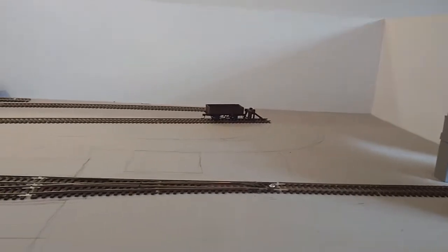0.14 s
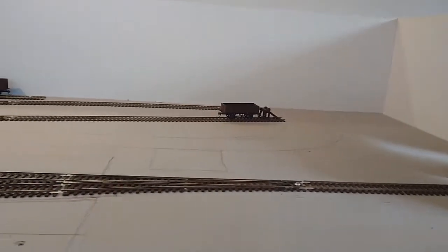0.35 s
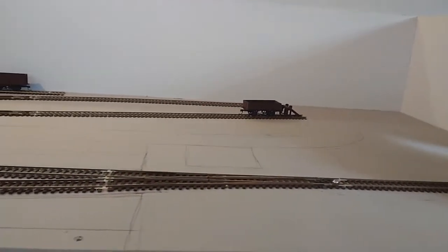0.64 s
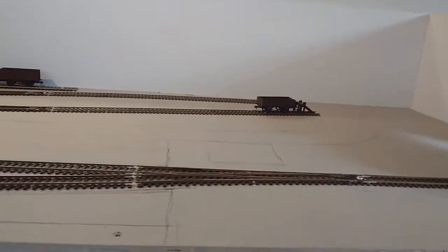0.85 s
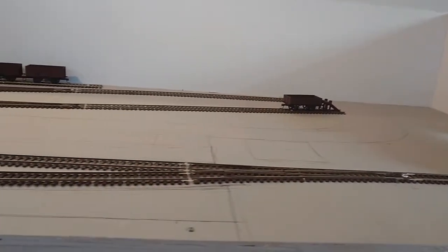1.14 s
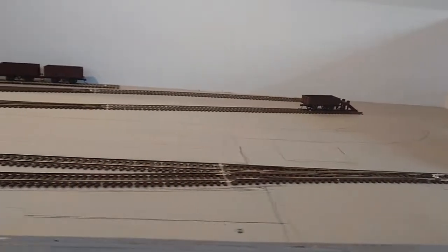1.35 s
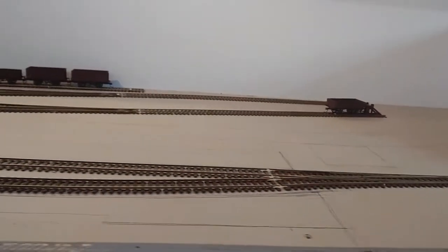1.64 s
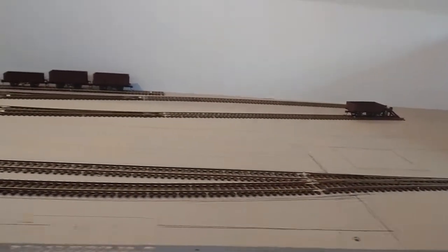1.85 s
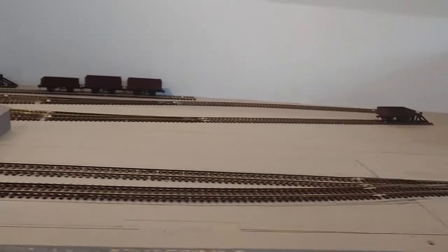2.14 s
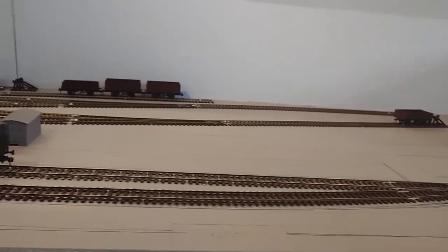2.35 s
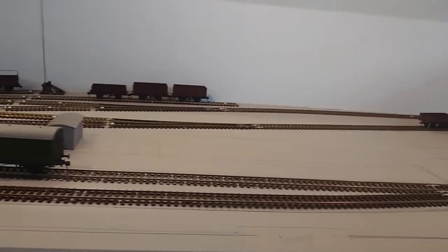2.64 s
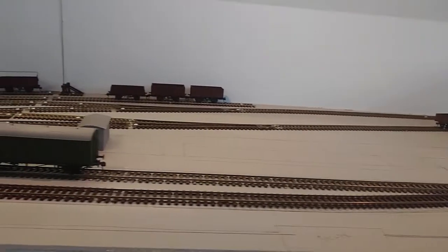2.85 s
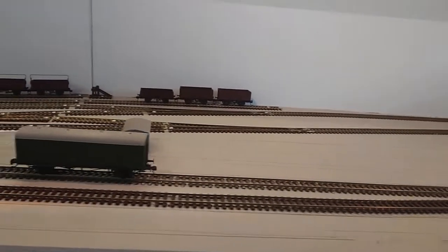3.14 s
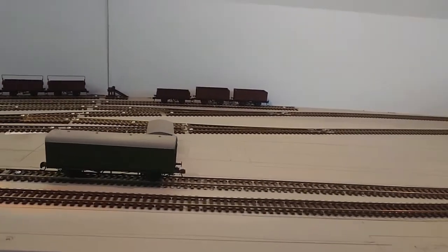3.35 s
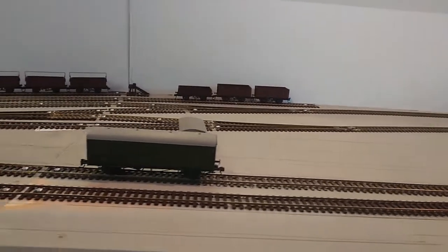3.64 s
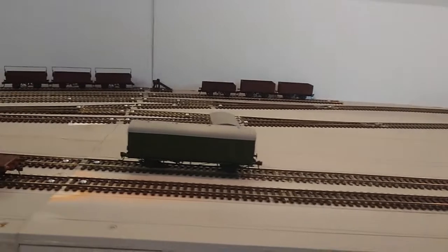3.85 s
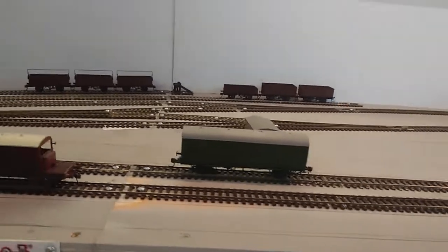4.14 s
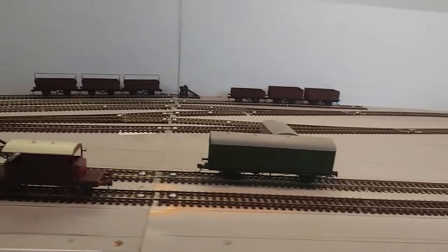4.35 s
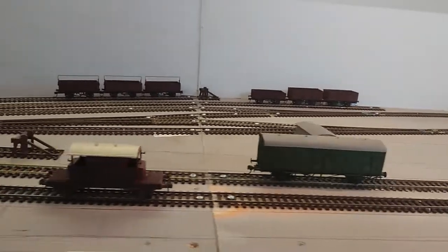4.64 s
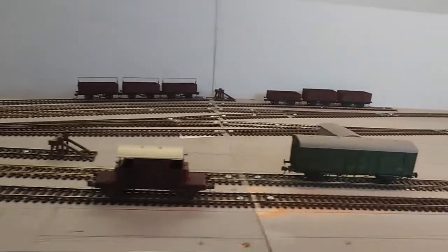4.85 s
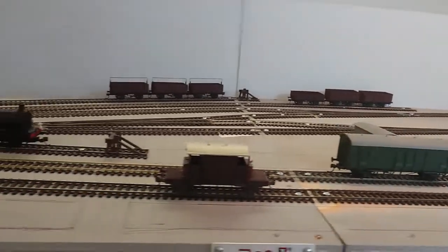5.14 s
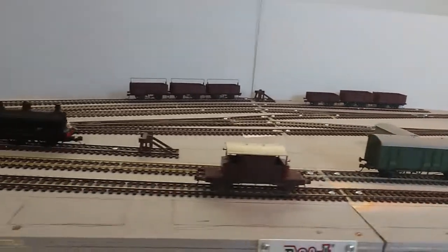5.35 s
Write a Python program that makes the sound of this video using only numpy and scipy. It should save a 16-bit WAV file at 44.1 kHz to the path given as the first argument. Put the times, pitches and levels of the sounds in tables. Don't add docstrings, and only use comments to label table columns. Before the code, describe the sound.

Indoors, a low fuzzy electrical hum runs under sharp plastic snaps, hard knocks and soft rustling as a handheld device is carried about.

```python
import sys
import numpy as np
from scipy import signal
from scipy.fft import rfft, irfft, next_fast_len
from scipy.io import wavfile
from scipy.ndimage import uniform_filter1d, map_coordinates

SR = 44100
rng = np.random.default_rng(int(sys.argv[2]) if len(sys.argv) > 2 else 0)


def attenuation_scalar(level_db):
    decades = np.asarray(level_db, float) / 20
    return 10 ** decades


def unload_wav(signal):
    wavfile.write(
        sys.argv[1],
        SR,
        np.round(np.clip(np.atleast_2d(signal).T, -1, 1) * 32767).astype(np.int16),
    )


N = 242991


def unit(x):
    return x / np.sqrt(np.mean(x ** 2) + 1e-20)


def peak1(x):
    return x / np.max(np.abs(x), axis=-1, keepdims=True)


def along(points, hz):
    point_hz, db = np.transpose(points)
    return attenuation_scalar(np.interp(np.log(hz + 1), np.log(point_hz + 1), db))


def curves(rows):
    times, *columns = np.transpose(rows)
    return [np.interp(np.arange(N) / SR, times, column) for column in columns]


def wobble(rate):
    knots = rng.standard_normal(int(N * rate / SR) + 4)
    return map_coordinates(knots, [np.arange(N) * rate / SR])


def filtered(x, response):
    size = next_fast_len(x.shape[-1] + 8192)
    hz = np.fft.rfftfreq(size, 1 / SR) + 1e-3
    return irfft(rfft(x, size) * response(hz), size)[..., :x.shape[-1]]


def modes(table):
    def response(f):
        total = 0
        for k, (centre, width, db) in enumerate(table):
            total = total + (-1) ** k * attenuation_scalar(db) * 1j * f * width / (centre * centre - f * f + 1j * f * width)
        return total
    return response


def patchy(depth_db):
    spectrum = signal.stft(rng.standard_normal((2, N + 512)), nperseg=512)[2]
    field = uniform_filter1d(rng.standard_normal(spectrum.shape), size=6, axis=1)
    field = uniform_filter1d(field, size=8, axis=2)
    return signal.istft(spectrum * attenuation_scalar(depth_db * unit(field)), nperseg=512)[1][:, :N]


def add(track, s, sound):
    start = max(round(s * SR), 0)
    track[:, start:start + sound.shape[1]] += sound[:, :N - start]


def pan(db):
    return attenuation_scalar(np.array([db / 2, -db / 2])).reshape(2, -1)


# (frequency [Hz], width [Hz], level [dB])
HUM_MODES = [(170.3, 7.3, 2.5), (188.2, 9.3, 3), (206.1, 6.5, 1.5), (232.8, 20, -4.5), (262, 11, -7.5),
             (288, 5.7, -10.5)]
# (frequency [Hz], level per Hz [dB])
RUMBLE_COLOUR = [(20, -40), (33, -8), (50, 21.5), (65, 6.5), (105, 6), (150, 0), (260, -5), (380, -74),
                 (1200, -100)]
# (time [s], rumble level [dB])
ARM_SWAY = [(0, -49), (.21, -59), (1, -52.5), (1.46, -51.5), (1.67, -46.5), (1.76, -57), (1.98, -46),
            (2.32, -48), (2.44, -38.5), (2.87, -53.5), (3.22, -40.5), (3.44, -44.5), (4.11, -46.5),
            (4.24, -53), (4.6, -50.5), (4.96, -56), (5.34, -42.5), (5.51, -53.5)]
# (time [s], level [dB])
PALM_COVER = [
    (0, 1.5),
    (.7, -8.5),
    (1.4, -11),
    (2.1, -7),
    (2.8, -23),
    (3.3, -16),
    (4, -21.5),
    (4.8, -36),
    (5.51, -21),
]


def room():
    (rumble_db,), (palm_db,) = curves(ARM_SWAY), curves(PALM_COVER)
    hum_db = -49 + 0.12 * palm_db
    side_db = 5 + 0.49 * palm_db
    a, b = filtered(rng.standard_normal((2, N)), lambda f: modes(HUM_MODES)(f) / (1 + (f / 300) ** 8))
    ports = unit(np.array([a + 0.081 * b, a - 0.16 * b]))
    hum = attenuation_scalar(hum_db + 0.38 * wobble(2.88)) * pan(4.5) * ports
    a, b = filtered(rng.standard_normal((2, N)), lambda f: along(RUMBLE_COLOUR, f))
    lumps = attenuation_scalar(2.8 * np.array([wobble(27), wobble(5.6)]))
    rumble = unit(lumps * np.array([a + 0.5 * b, a - 0.5 * b]))
    return hum + attenuation_scalar(rumble_db + 1.5) * pan(side_db) * rumble


# (time [s], rustle level [dB])
FINGER_PRESSURE = [(0, -64.5), (.35, -63.5), (1.23, -63), (1.4, -62.5), (2.13, -63), (2.55, -59.5),
                   (2.87, -61), (3.22, -61), (3.43, -59.5), (3.5, -54.5), (3.56, -52), (3.62, -57),
                   (3.75, -60), (3.9, -58.5), (4.16, -62), (4.68, -59.5), (5.28, -63.5), (5.51, -63)]
# (frequency [Hz], level per Hz [dB])
LEFT_RUB = [(250, 9), (400, 1), (800, -5), (1800, -4.5), (2500, -5.5), (3000, -12), (4500, -8),
            (5300, -14.5), (6300, -28.5), (8000, -80)]
RIGHT_RUB = [(250, -21), (400, -2.5), (800, -4.5), (1800, -8.5), (2600, -6.5), (3200, -16), (3900, -24.5),
             (4600, -47), (5500, -40), (7500, -91)]
# (frequency [Hz], level per Hz [dB])
OPEN_PORT = [(2200, -32), (3000, 2.5), (3700, 0.5), (4500, -9.5), (5300, -15), (6500, -83)]
# (frequency [Hz], level per Hz [dB])
LEFT_HISS = [(5800, -41), (6400, -8), (7300, 0), (8500, 10), (10000, 5.5), (11000, -3.5), (11700, -32),
             (12600, -39), (13400, -53), (16000, -92)]
RIGHT_HISS = [(5800, -56), (6400, -32), (7300, -10), (8500, -32), (10000, -10.5), (11000, -8), (11700, -30),
              (12600, -9), (13200, -65), (16000, -118)]


def grip():
    rustle_db, palm_db = curves(FINGER_PRESSURE)[0], curves(PALM_COVER)[0]
    fizz_db = -72.5 + 0.9 * (rustle_db - rustle_db.mean()) + 0.11 * palm_db
    noise = patchy(depth_db=2.5)
    rustle = unit(filtered(noise, lambda f: [along(LEFT_RUB, f), along(RIGHT_RUB, f)]))
    rustle[1] += attenuation_scalar(palm_db) * unit(filtered(noise[1], lambda f: along(OPEN_PORT, f)))
    fizz = unit(filtered(patchy(depth_db=1.5), lambda f: [along(LEFT_HISS, f), along(RIGHT_HISS, f)]))
    fizz[1] *= attenuation_scalar(0.16 * (palm_db + 31))
    flutter_db = 1.1 * wobble(25)
    return attenuation_scalar(rustle_db + 1.0 + flutter_db) * pan(2) * rustle + attenuation_scalar(fizz_db + 4.5 + flutter_db) * fizz


# (time [s], length [s], centre [Hz], level [dB], left minus right [dB])
SQUEAK_EVENTS = [(0.767, 0.034, 1150, -75, 17), (0.809, 0.023, 796, -75, 20), (1.404, 0.016, 3200, -72, -8),
                 (1.444, 0.024, 1850, -61.5, 11), (1.826, 0.04, 1170, -65, 10),
                 (1.885, 0.032, 3100, -73, -14), (2.041, 0.023, 3060, -69, -14),
                 (2.258, 0.033, 2200, -68, 8), (3.559, 0.017, 2070, -56, 9), (4.293, 0.01, 2500, -74.5, 25),
                 (4.57, 0.015, 594, -82, -35)]
# (time [s], length [s], centre [Hz], level [dB], left
# minus right [dB])
SCRAPE_EVENTS = [(0.231, 0.0053, 3100, -52.5, 6), (0.257, 0.019, 1230, -60, -6),
                 (1.26, 0.0043, 2000, -62, -7), (2.866, 0.0038, 1500, -58, 2),
                 (2.945, 0.0027, 3050, -59, 18), (3.229, 0.0027, 2040, -64, -16),
                 (3.258, 0.002, 2800, -45, 16), (3.266, 0.011, 940, -54, -4),
                 (3.639, 0.027, 1020, -53.5, 7), (3.818, 0.0043, 550, -58, -5),
                 (3.886, 0.0066, 785, -55, 2), (3.901, 0.012, 770, -60, 6), (.246, 0.02, 2630, -58.5, 4),
                 (4.073, 0.015, 2300, -58.5, -14)]
# (time [s], length [s], centre [Hz], level
# [dB])
NAIL_EVENTS = [
    (0.229, 0.0015, 8800, -63),
    (0.267, .0067, 8300, -57),
    (2.453, 0.0028, 8550, -52),
    (2.463, .004, 14300, -64),
    (2.945, 0.0035, 8350, -62.5),
    (3.266, 0.00084, 9500, -46),
]


def rubs():
    out, t = np.zeros((2, N)), np.arange(-SR // 10, SR // 10) / SR
    # a share of the centre for squeaks and scrapes, 1500 Hz for the nail
    puffs = [(s, length, hz, 0.22 * hz, *rest) for s, length, hz, *rest in SQUEAK_EVENTS]
    puffs += [(s, length, hz, 0.85 * hz, *rest) for s, length, hz, *rest in SCRAPE_EVENTS]
    puffs += [(s, length, hz, 1500, db, 28.5) for s, length, hz, db in NAIL_EVENTS]
    for s, length, hz, width, db, side_db in puffs:
        noise = filtered(rng.standard_normal(len(t)),
                         lambda f: modes([(hz, width, 0)])(f) ** 2 / (1 + (f / hz / 2) ** 4))
        shaped_t = np.where(t < -length / 2, 3 * t + length, t)
        add(out, s + t[0], attenuation_scalar(db) * pan(side_db) * unit(noise) * np.exp(-(shaped_t / length) ** 2))
    return out


# (time [s], tick level [dB], knock level [dB], swing level [dB])
HARD_TAPS = [(0.0544, -45, -41, -42), (0.5564, -27, -22, -17), (0.932, -24, -20, -16),
             (1.268, -23, -20, -16.5), (1.5624, -18, -20.5, -15.5), (1.9473, -22, -22, -16.5),
             (2.0298, -23.5, -18.5, -14), (2.1682, -23.5, -18, -14.5), (2.2987, -22.5, -26, -18),
             (2.3842, -25.5, -20, -20.5), (2.715, -22.5, -25.5, -20), (3.0805, -23, -26.5, -22.5)]
# (time [s], tick level [dB], knock level [dB])
OTHER_TAPS = [
    (1.2239, -36.5, -42),
    (3.239, -57, -34),
    (3.631, -49, -44),
    (3.654, -49, -37),
    (4.065, -20.5, -26.5),
]
# (frequency [Hz], width [Hz], level [dB])
LOOSE_PART = [(797, 126, -3.5), (1210, 240, 3), (1770, 360, 3.5), (2200, 810, 3), (2800, 1530, 3.5),
              (3440, 730, 3.5), (4370, 1200, -10)]
# (frequency [Hz], level per Hz [dB])
BRIGHT_EDGE = [(1000, 4.5), (2500, 1), (5000, -0.5), (6300, -11), (7600, 4), (9500, 2.5), (11500, -20.5),
               (12800, -30), (14500, -30), (16500, -48)]


def taps():
    out, t = np.zeros((2, N)), np.arange(-SR // 100, SR // 30) / SR
    blow = np.arange(len(t)) == np.argmax(t >= 0)

    def tick_response(f):
        ring = modes(LOOSE_PART)(f) / (1 + 1j * f / 5200) / (1 + (f / 4300) ** 8)
        return ring * [1j * f / (2400 + 1j * f), f > 0]

    for s, right_db, panel_db in sorted([row[:-1] for row in HARD_TAPS] + OTHER_TAPS):
        left_db = right_db - 21
        knock_db = np.array([[panel_db], [panel_db - 21.5]])
        grit_level = np.where(t < 0, 0.085 * np.exp(-(t / 0.003) ** 2), 0.11 * np.exp(-t / 0.002))
        grit = rng.standard_normal((2, len(t))) * grit_level - 1.33 * blow
        tick = attenuation_scalar([[left_db], [right_db]]) * peak1(filtered(grit, tick_response))
        edge = peak1(filtered(grit, lambda f: along(BRIGHT_EDGE, f) * (f > 3000)))
        tick = tick + attenuation_scalar(right_db - 25.5) * edge * [[0.5], [1]]
        after = np.maximum(t + 0.000073, 0)
        hz = 480 * rng.uniform(1.0, 1.05)
        envelope = np.exp(-after / 0.0017) * (1 - np.exp(-after / 0.0014)) * 2.12
        knock = -np.sin(2 * np.pi * hz * after) * envelope
        add(out, s + t[0], tick + attenuation_scalar(knock_db + 3) * knock)
    return out


# (time [s], left level [dB], right level [dB], length [s])
HAND_JOLTS = [(0.288, -34, -40, 0.031), (1.244, -48, -6.5, 0.0057), (2.444, -24, -43, 0.016),
              (2.482, -21, -21, 0.039), (2.536, -10.5, -40, 0.031), (2.542, -20, -38, 0.024),
              (2.855, -54, -23, 0.031), (3.137, -25.5, -28, 0.069), (2.946, -25, -49, 0.014),
              (3.224, -54, -27, 0.042), (3.268, -18, -42, 0.016), (3.387, -27, -45, 0.048),
              (3.567, -35, -25, 0.11), (3.625, -48, -22.5, 0.036), (3.99, -70, -27, 0.016),
              (4.064, -27, -16.5, 0.059), (4.174, -52, -25, 0.036), (4.602, -55, -36.5, 0.033),
              (5.192, -63, -35, 0.036), (5.375, -42, -21.5, 0.032)]


def shakes():
    out, t = np.zeros((2, N)), np.arange(SR // 5) / SR
    tapped = [(s + 0.001, db, db - 9.5, 0.037) for s, *_, db in HARD_TAPS]
    for s, left_db, right_db, length in HAND_JOLTS + tapped:
        turns = 60.1 * (0.914 * t + 0.28 * 0.016 * (1 - np.exp(-t / 0.0069)))
        envelope = np.exp(-(t / (0.78 * length)) ** 2.0) * (1 - 1.12 * np.exp(-t / 0.0045))
        swing = np.sin(2 * np.pi * np.maximum(turns - 0.22, 0)) * envelope
        add(out, s, attenuation_scalar([[left_db - 0.5], [right_db]]) * swing)
    return out


NOTCH_HZ = 6320

# ((frequency [Hz], time to fall 60
# dB [s]), [(time [s], left level [dB], right level [dB]), ..])
SHELL_FACETS = [
    ((813, 0.0057), [(.2688, -23, -45), (1.268, -35, -33.5), (2.4617, -19.5, -39), (2.4949, -29, -49), (3.5494, -59, -42)]),
    ((1610, 0.0045), [(1.268, -60, -28.5), (2.4949, -46, -36), (2.5782, -37, -44), (3.1294, -34, -42), (3.197, -53, -46), (3.5494, -41, -31.5)]),
    ((2410, 0.0014), [(.2688, -50, -46), (2.4617, -52, -45), (2.4949, -62, -34), (2.5782, -22, -46), (3.1294, -45, -37), (3.197, -34, -38), (3.2394, -60, -35), (3.2633, -35, -61), (3.3811, -29.5, -42), (3.6079, -31.5, -47), (3.6318, -48, -38), (3.654, -65, -45), (4.0648, -56, -29.5)]),
    ((4840, 0.002), [(.2688, -45, -58), (1.5626, -43, -51), (1.9469, -49, -48), (2.1683, -51, -55), (2.4617, -44, -54), (2.5502, -43, -65), (2.5782, -25.5, -54), (3.1294, -20, -46), (3.2633, -48, -67), (3.3811, -44.5, -69), (3.5494, -18, -48), (3.6079, -22, -66)]),
    ((10000, 0.0033), [(.2688, -40, -52), (.895, -33, -76), (1.7706, -44, -65), (2.4617, -40.5, -56), (2.4949, -38, -54)]),
    ((13400, .004), [(.2688, -55, -66), (1.268, -66, -71), (1.7706, -64, -72), (2.4949, -52, -58), (2.5502, -65, -65), (3.1294, -68, -57), (3.197, -65, -72), (3.3811, -72, -64), (3.6079, -55, -80)]),
                ((740, 0.0054), [ (2.5267, -21, -39), (3.9, -60, -56), (1.368, -49, -53), (.2546, -40, -55)]),
    ((2870, .004), [(2.4617, -53, -44), (2.5782, -35, -55), (3.6284, -51, -60), (3.2372, -60, -42), (.5564, -62, -49)]),
    ((4280, .004), [(.5564, -65, -46), (.932, -54, -49), (1.268, -57, -47), (1.9469, -54, -35), (2.4617, -40, -51), (3.2394, -56, -65)]),
    ((14200, .005), [(.5564, -83, -71), (.932, -90, -75), (1.368, -66, -76), (1.5626, -77, -73), (2.0302, -88, -66), (2.1683, -76, -76), (2.5267, -66, -63), (2.5835, -61, -90), (2.715, -84, -77), (3.2633, -59, -68)]),
                ((1200, .005), [(.2688, -31, -50), (1.268, -36, -27), (1.5626, -55, -33), (2.4617, -25, -40), (2.4949, -30, -37), (2.5267, -30, -41), (2.5502, -38, -48), (2.851, -52, -45), (3.1285, -29, -42), (3.3811, -40, -45), (3.549, -38, -40), (3.6284, -50, -48)]),
    ((3300, .003), [(.5564, -60, -44), (1.5626, -55, -42), (2.0302, -58, -44), (2.1683, -58, -44), (2.715, -58, -45), (2.851, -62, -52), (3.2394, -52, -45), (3.2585, -45, -55), (3.2694, -50, -58), (3.5711, -50, -55), (3.654, -55, -48)]),
    ((1700, .003), [(2.715, -55, -44), (3.2585, -48, -46), (3.5711, -50, -50), (4.065, -60, -48), (.932, -50, -54), (3.197, -50, -38), (3.3811, -50, -39), (3.6079, -50, -35)]),
    ((800, .005), [(2.5502, -45, -36), (2.5782, -50, -37), (2.5932, -55, -44), (3.6284, -55, -39), (3.632, -44, -46), (1.7706, -55, -49), (1.3235, -55, -48)]),
    ((8700, .003), [(3.5494, -20, -48), (3.2394, -46, -70), (3.2585, -46, -70), (3.632, -49, -70), (2.4617, -25, -45)]),
    ((3200, .003), [(4.0648, -60, -31), (2.5613, -56, -66), (1.9469, -54, -33)]),
]


def facets():
    out, t = np.zeros((2, N)), np.arange(SR // 100) / SR
    for (hz, t60), breaks in SHELL_FACETS:
        for s, *port_db in breaks:
            grit = 1 + 0.098 * uniform_filter1d(rng.standard_normal((2, len(t))), size=15)
            detuned_hz = hz * np.exp(0.055 * rng.standard_normal((2, 1)))
            ring = np.sin(2 * np.pi * detuned_hz * t) * t ** 2.4 * attenuation_scalar(-100 * t / t60) * grit
            level = attenuation_scalar(np.array(port_db)[:, None] - 7)
            add(out, s - t60 / 8, level * ring / np.std(ring, axis=1, keepdims=True))
    return filtered(out, lambda f: (NOTCH_HZ ** 2 - f * f) / (NOTCH_HZ ** 2 - f * f + 9900j * f))


# (time [s], crack level [dB],
# brightness [dB], left push [dB], right push [dB])
LEFT_CRACKS = [(0.2178, -44, -14, -22, -54), (0.2543, -49, -12, -17.5, -59), (0.2688, -6.5, -26, -13, -29),
               (1.268, -24, -13.5, -16, -31), (2.434, -41, -6, -14, -35), (2.4544, -38, 6, -16.5, -52),
               (2.4615, -20.5, -4.5, -9, -24), (2.4948, -20.5, -8, -11.5, -27),
               (2.5265, -7.5, -17, -23, -25), (2.5501, -12, -10.5, -13, -18.5),
               (2.5612, -44, -14, -13, -29), (2.578, -20.5, -7.5, -19, -14), (3.1292, -9.5, -10, -12.5, -9),
               (3.197, -18, -9, -25, -25), (3.2635, -27.5, -11.5, -27, -20),
               (3.3812, -21, -5.5, -24, -13.5), (3.5494, -21.5, 2.5, -10, -13),
               (3.5703, -33, -27, -55, -27), (3.6081, -20.5, -9, -11.5, -15.5),
               (3.6288, -23.5, -39, -44, -33), (3.6533, -35.5, -23, -34, -31)]
# (time [s], crack level [dB], brightness [dB], left push [dB], right push [dB])
RIGHT_SIDE_CRACKS = [
    (1.972, -32, -24, -43, -49),
    (2.8504, -14, -22, -26.5, -11),
    (3.8135, -53, -12, -33.5, -48),
    (4.008, -33, -16, -40, -38),
]
# (time [s], brightness [dB], left
# push [dB], right push [dB])
DULL_POPS = [(0.264, 2, -28.5, -53), (0.895, -6.5, -14.5, -26), (1.3234, -7, -15.5, -27),
             (1.368, -8, -11.5, -30), (1.378, -15, -20, -37), (1.7706, -6, -13.5, -32),
             (2.3141, -4.5, -14, -27), (2.363, -8, -12, -26), (2.3694, -20, -16, -37),
             (2.445, -15, -17.5, -30), (2.5526, -14, -13.5, -23), (2.5832, -3, -9, -18),
             (2.5929, -12, -15.5, -36), (2.9422, -13, -16, -20.5), (3.2639, -17, -13, -23),
             (3.2695, -22, -15.5, -20), (3.3791, -7, -16, -18)]
# (time [s], crack level [dB], brightness [dB], push level [dB])
FINGERTIP_TICKS = [
    (0.4054, -54.5, -3.5, -64),
    (0.993, -50, -10, -62),
    (2.408, -40, -19, -51),
    (3.019, -44, -17, -50),
    (3.8822, -41.5, -10, -43),
    (3.93, -54, -8, -55),
]


def contacts():
    rows = [(s, db, db - 6, *rest) for s, db, *rest in LEFT_CRACKS]
    rows += [(s, db - 18, db, *rest) for s, db, *rest in RIGHT_SIDE_CRACKS]
    rows += [(s, -37, -43, *rest) for s, *rest in DULL_POPS]
    rows += [(s, db, db + 9, bright, push, push + 1) for s, db, bright, push in FINGERTIP_TICKS]
    return sorted(rows)


# (frequency [Hz], level per Hz [dB])
DULL_BODY = [(250, 5), (450, 7.5), (1000, 0.5), (2000, -5), (3500, -10.5), (6000, -40), (12000, -91)]
# (frequency [Hz], width [Hz], level [dB])
SHELL_RING = [(465, 52, -3), (282, 67, -8)]
EARLY_BREAKS = [2.4617]


def snaps():
    out, t = np.zeros((2, N)), np.arange(-SR // 20, SR // 10) / SR
    the_break = np.arange(len(t)) == np.argmax(t >= 0)

    def low_cut(f, hz, q):
        return -f * f / (hz * hz - f * f + 1j * f * hz / q)

    for s, left_db, right_db, bright_db, *push_db in contacts():
        corner, suck, lag, lead = rng.uniform([0.93, 1.8, 0.0008, 0.00015], [1.07, 2.2, 0.0011, 0.00025])
        drag = 1 + np.clip(-36 - max(left_db, right_db), 0, 9) / 4
        rattle = attenuation_scalar(-13) * np.exp(-np.abs(t) / 0.0028)
        falling = np.exp(-t / 0.0005 / drag ** 1.5) + rattle
        grit_level = np.where(t < 0, np.exp(t / 0.0008), falling) * drag
        grit = 0.035 * np.clip(rng.standard_normal(len(t)), -2.3, 2.3) ** 3 * grit_level + the_break
        body = peak1(filtered(grit, lambda f: along(DULL_BODY, f)))
        edge = peak1(filtered(grit, lambda f: along(BRIGHT_EDGE, f)))
        near = body + attenuation_scalar(bright_db + 14.0) * edge
        far_edge = np.roll(edge, round(0.24 * lag * SR))
        far = np.roll(body, round(0.26 * lag * SR)) + attenuation_scalar(bright_db - 18.0) * far_edge
        crack = attenuation_scalar([[left_db - 0.5], [right_db - 12.5]]) * [near, far]

        breaks_early = np.min(np.abs(s - np.array(EARLY_BREAKS))) < 0.0025
        head_start = -0.0009 if breaks_early else 0.00095 * (drag == 1)
        late = t + head_start - np.array([[0], [lag]])
        rise = np.array([[0.00036], [0.0004]])
        step = 0.5 + 0.5 * np.tanh((late - 0.00034) / rise)
        step = step - suck * np.array([[1], [0.15]]) * np.exp(-((late + lead) / 0.00034) ** 2)
        push = filtered(step, lambda f: [low_cut(f, 87 * corner, 2.48) * (1 + modes(SHELL_RING)(f / corner)),
                                         low_cut(f, 78 * corner, 1.04)])
        push = attenuation_scalar(np.array(push_db)[:, None] - 2.5) * peak1(push) * np.exp(-(t / 0.036) ** 4)
        add(out, s + t[0], crack + push)
    return filtered(out, lambda f: (NOTCH_HZ ** 2 - f * f + 650j * f) / (NOTCH_HZ ** 2 - f * f + 1500j * f))


def scene():
    return room() + grip() + rubs() + taps() + shakes() + facets() + snaps()


def roll_off(x):
    return signal.sosfilt(signal.butter(12, 16480, fs=SR, output="sos"), x)


def record(dry):
    strain = signal.lfilter([0.0012], [1, -0.9988], np.abs(dry))
    steadied = dry / (1 + 0.17 * strain)
    mix = filtered(steadied, lambda f: (-f * f / (33 ** 2 - f * f + 1.3j * f * 33)) ** 2 * (f < 16400))
    return roll_off(mix)


dry = scene()
out = record(dry)
unload_wav(out)
```